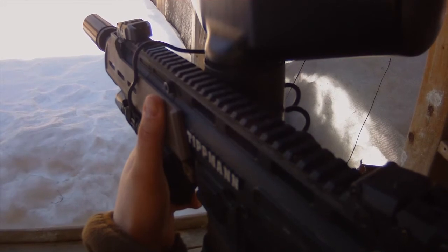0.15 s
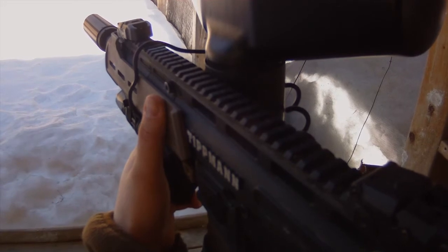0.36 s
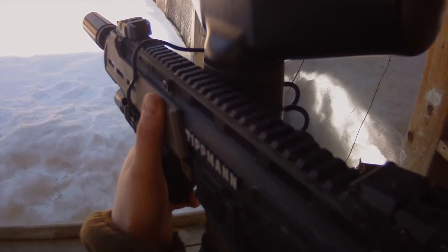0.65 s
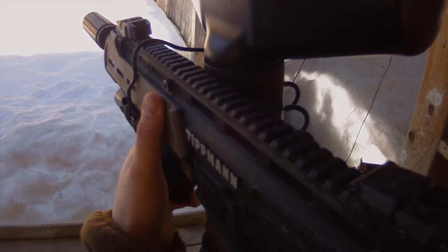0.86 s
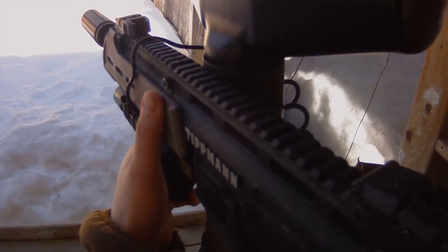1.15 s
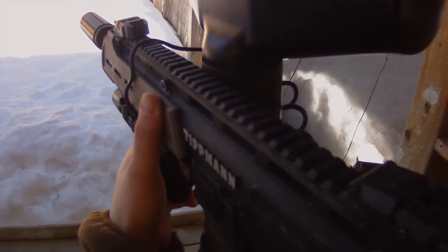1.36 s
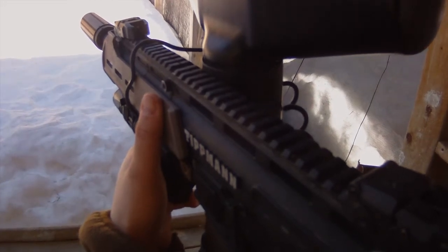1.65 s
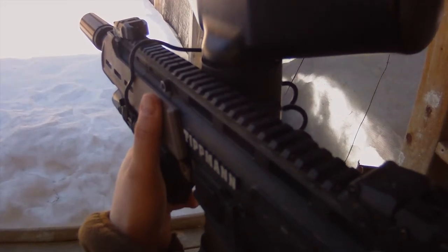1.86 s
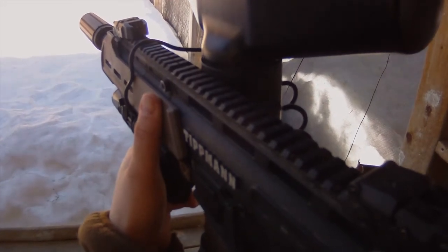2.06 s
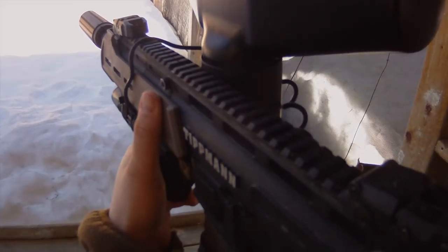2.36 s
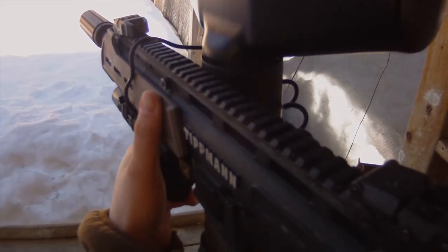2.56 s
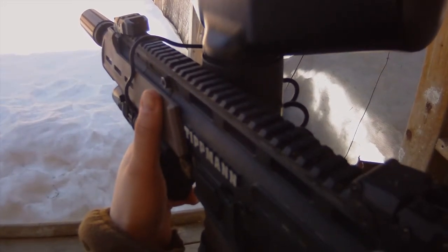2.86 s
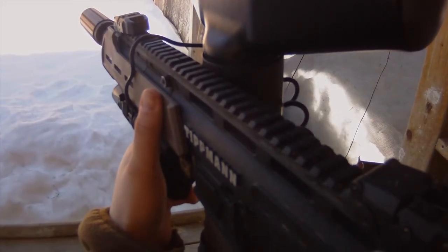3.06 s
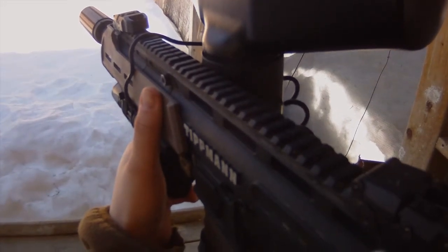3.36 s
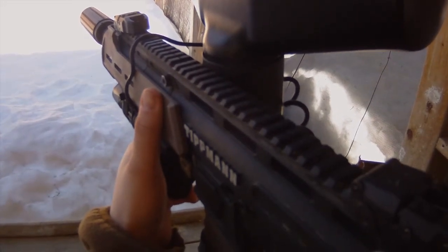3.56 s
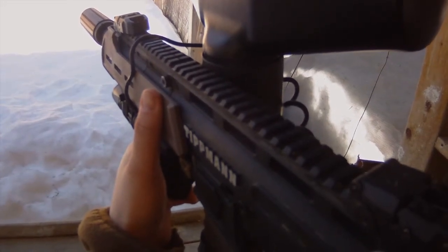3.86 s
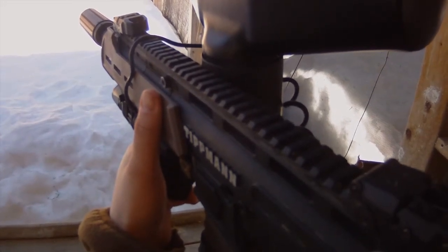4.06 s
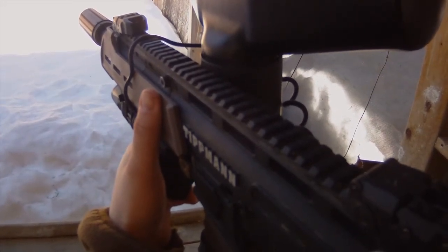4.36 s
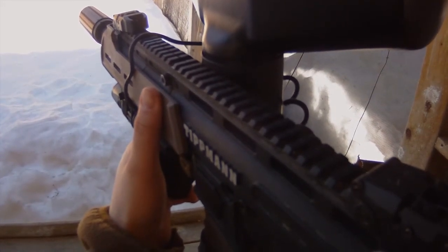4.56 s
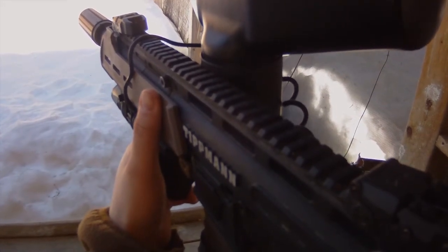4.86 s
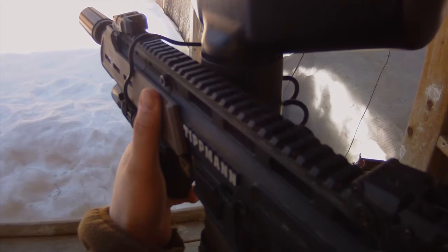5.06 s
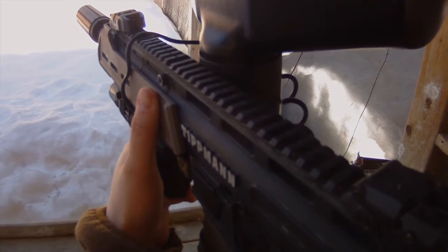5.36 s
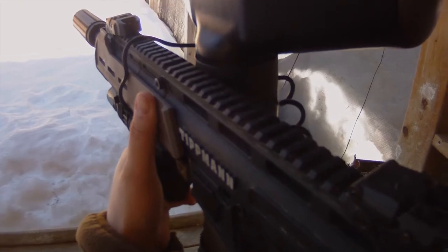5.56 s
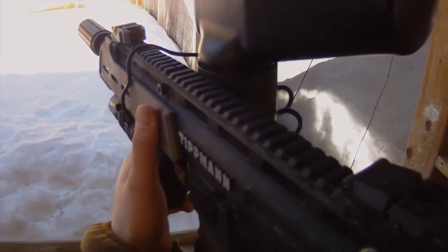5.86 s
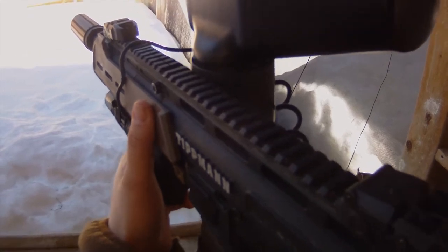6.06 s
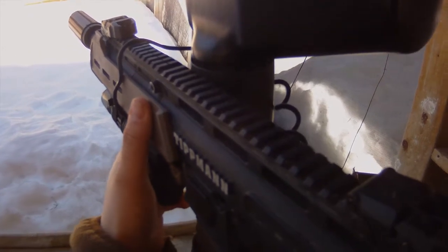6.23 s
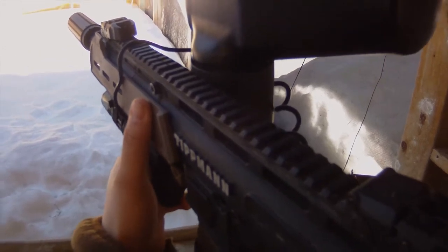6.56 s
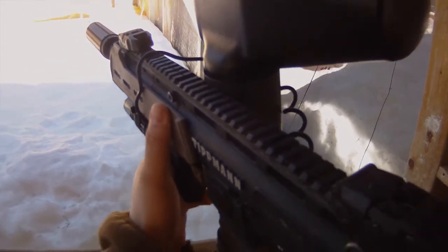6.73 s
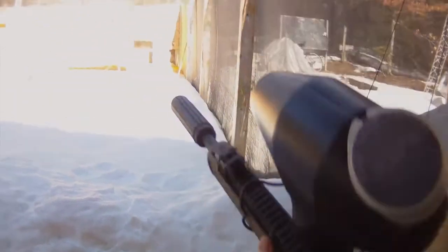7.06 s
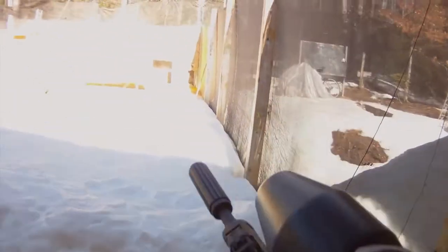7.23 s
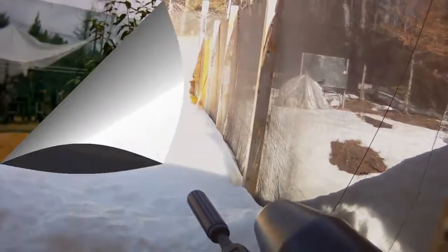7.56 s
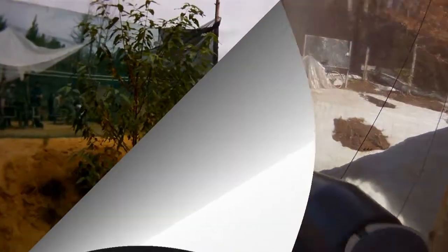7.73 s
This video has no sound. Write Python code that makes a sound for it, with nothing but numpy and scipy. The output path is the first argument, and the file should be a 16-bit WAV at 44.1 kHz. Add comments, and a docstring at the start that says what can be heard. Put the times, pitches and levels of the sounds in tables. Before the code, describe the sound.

In a wooden shelter on an open field, a paintball marker fires six full-auto bursts, thumping and clattering so close that the microphone slightly overloads. The first is longest, and the last three come in quick succession. Each leaves a short echo and faint ticks of balls. Two sharp snaps follow, then a lull with light wind. Near the end, a noisier background cuts in with distant markers popping.

```python
"""A wooden shelter on a snowy field: a paintball marker fires full-auto bursts, overloading a close mic.
Each shot is a thump of barrel air and a clatter of bolt and gas; the field echoes, single balls land and
faint ticks rattle on, likely in the hopper. Two sharp snaps follow the last burst, then balls shift as the
marker is lowered. Wind and a few hand bumps rumble on the mic. Near the end a noisier background
sets in abruptly, with markers popping farther off."""
import sys
import numpy as np
from scipy import signal
from scipy.fft import rfft, irfft
from scipy.io import wavfile
from scipy.ndimage import uniform_filter1d

SR = 44100
rng = np.random.default_rng(int(sys.argv[2]) if len(sys.argv) > 2 else 0)


def dump_mix(stems):
    """Bounce the given channels to the path in sys.argv[1] as a 16-bit WAV at rate SR."""
    frames = np.atleast_2d(stems).T  # one column per channel
    limited = np.clip(frames, -1, 1)  # hard clip at full scale
    pcm = np.round(limited * 32767).astype(np.int16)
    wavfile.write(sys.argv[1], SR, pcm)


N = 348384

# spectrum of the bolt's clack: f/Hz, level/dB
CLACK_SPECTRUM = [(100, -20.5), (400, -30.5), (750, -26.5), (1150, 0.5), (2400, -2), (4100, 2.5),
                  (4800, -7), (6600, 0), (7400, -9.5), (9000, -13.5), (11000, -9.5), (13000, -33.5)]
# resonances of the marker's body: f/Hz, width/Hz, height/dB
BODY_MODES = [(1220, 66, -1), (1354, 20, 5.5), (1950, 51, -1.5), (1960, 96, 5.5), (2296, 390, 7),
              (2410, 64, 4.5), (3010, 160, 4), (3450, 38, 6), (3620, 64, 5), (3990, 180, 1), (4280, 50, 7)]
# spectrum of a ball's impact: f/Hz, level/dB
BALL_SPECTRUM = [(150, -13), (350, -3), (540, 6), (800, -2), (1400, 1), (2400, 2.5), (4100, 3.5),
                 (4900, -10.5), (6700, -3.5), (8000, -13.5), (12000, -10.5)]
# spectrum of the echo off shelter and field: f/Hz, level/dB
ECHO_SPECTRUM = [(60, -16.5), (200, 0), (350, 3.5), (550, 2.5), (780, -4.5), (1300, -2), (2500, -2.5),
                 (4100, -2.5), (4900, -12.5), (6600, -9.5), (8000, -13), (12000, -22.5)]


def shots(cycle_s=0.03517, jitter_s=.00028, spread_db=.5, clack_sag=0.18):
    """Firing times and strengths (t/s, thump/dB, clack/dB); gas pressure can sag and recover."""
    # trigger pulls: t/s, shots, thump level/dB, clack level/dB, pressure sag/dB, shots to deepest sag
    bursts = [(-0.371, 10, -29, -11.5, 0, 1), (0.9567, 13, -12, -13.5, 6, 1.48),
              (2.5364, 7, -12, -13, 6, 0.7), (3.1618, 6, -12.5, -13, 0, 1), (4.3703, 5, -13, -14, 1.5, 1.7),
              (4.7061, 5, -12.5, -14, -0.5, 1), (5, 5, -11.5, -13, 1.5, 1)]
    # shots short of gas: t/s, thump loss/dB
    weak_shots = [(1.273, 1.5), (2.677, 4), (3.267, 4.5)]
    fired = []
    for start, count, thump_db, clack_db, sag_db, deepest in bursts:
        for k in range(count):
            s, progress = start + k * cycle_s, k / deepest
            sag = sag_db * progress * np.exp(1 - progress)
            lost = sum(db for at, db in weak_shots if abs(at - s) < cycle_s / 2)
            thump_vary, clack_vary = spread_db * rng.standard_normal(2)
            s += jitter_s * rng.standard_normal()
            fired.append((s, thump_db - sag - lost + thump_vary, clack_db - clack_sag * sag + clack_vary))
    return fired


def marker(fired, close_db=6, echo_db=19, lead_s=.02, jitter_s=.0002, spread_db=2):
    """The marker at the mic: each shot is a cycle of blows, a thump and an echo, never quite alike."""
    # sear, bolt, hammer on the valve (touch, crack), gas (drive, hiss), wall slap, vent, bolt catch,
    # settling: t/ms from the shot, level/dB, decay/ms, tilt/dB per octave, share of clean impact
    cycle = [(-10, -0.5, 2.1, 1, 0), (-6, 1.5, 4.2, 0.5, .05), (-3.5, 3.5, 9, -3.5, 0.3),
             (0.34, 19, 0.96, -1.1, .3), (2, 15, 6.4, -1.4, 0), (4, 10.5, 1.1, 5.5, .05),
             (5.4, 10.5, 1.5, -1, 0.6), (11, 0, 1.7, 1.5, 0.4), (14.5, 12, 3, -3.6, 0.1),
             (21, -1, 8.9, 2.5, 0)]
    out, impact = np.zeros(N), signal.unit_impulse(3000)
    blows = [(ms / 1000, db, decay_ms, clean, puff(decay_ms), ring(CLACK_SPECTRUM, tilt, BODY_MODES))
             for ms, db, decay_ms, tilt, clean in cycle]
    steady_echo, stray_echoes = field_echo(), [field_echo() for _ in range(4)]
    for k, (s, thump_db, clack_db) in enumerate(fired):
        clack = rattle()
        for lag, db, decay_ms, clean, usual_push, body in blows:
            rough = blend(usual_push, puff(decay_ms), share=0.68)
            blow = signal.fftconvolve(blend(impact, rough, clean), body)
            add(clack, rng.normal(lead_s + lag, jitter_s), amp(rng.normal(db, spread_db)) * blow)
        # loose parts seat differently each time, so another band of the body speaks
        band = (rng.uniform(2700, 4400), 500, 4.5)  # f/Hz, width/Hz, height/dB
        chatter = ring([(20, 0), (20000, 0)], tilt=rng.normal(0.11, .6), peaks=[band], size=1024)
        chatter /= np.mean(abs(rfft(chatter)[20:50]))  # unity gain over about 1.7-4.3 kHz
        add(out, s - lead_s, amp(clack_db + close_db) * signal.fftconvolve(clack, chatter))
        add(out, s + .00028, amp(thump_db + close_db) * barrel_thump())
        add(out, s, amp(clack_db + echo_db) * blend(steady_echo, stray_echoes[k % 4], share=0.23))
    return out


def barrel_thump(barrel_hz=458.5, width_hz=157, size=3000):
    """Air in the barrel rings briefly, reaches the mic by several paths and sets the shelter booming."""
    # paths, direct and off gun, floor and walls: delay/ms, signed gain
    paths = [(0, 1), (1.256, -.54), (5.07, 1.4), (7.75, -.68), (8.06, .24), (13.84, .19)]
    # hollow modes of the shelter: f/Hz, width/Hz, signed gain
    shelter_modes = [(124.7, 31, 0.087), (236, 16, .14), (591.7, 22, -0.4)]
    out, t = np.zeros(size), np.arange(size) / SR
    hz = barrel_hz * rng.normal(1, 0.017)
    for ms, gain in paths:
        age = np.maximum(t - ms / 1000, 0)
        arrival = (age > 0) * np.exp(-np.pi * width_hz * age) * np.cos(2 * np.pi * hz * age)
        out -= gain * rng.normal(1, .07) * arrival
    boom = sum(gain * mode(f, width, t) for f, width, gain in shelter_modes)
    return highpass(highpass(out, hz=100) + boom, hz=45)


def rattle(db=-5, spread_db=3, count=5):
    """Loose parts and balls knock at random moments through one firing cycle."""
    out, body = np.zeros(SR // 8), ring(CLACK_SPECTRUM, tilt=3.3, peaks=BODY_MODES, size=2048)
    for s, force in zip(rng.uniform(.012, .047, count), rng.uniform(-2, 1, count)):
        push = unit_energy(puff(decay_ms=1, size=600))
        add(out, s, amp(db + spread_db * force) * signal.fftconvolve(push, body))
    return out


def field_echo(rise_s=0.0046, size=36000):
    """Echo of energy 1, grainy with reflections off trees and boards, the midrange lasting longest."""
    # reverberation time: f/Hz, t60/s
    decay_times = [(100, 0.08), (300, 0.41), (700, 0.71), (1500, 0.43), (3000, 0.38), (6000, 0.37),
                   (11000, 0.18)]
    grain = flutter(depth_db=3, span=150, size=size)
    hz, t, bands = signal.stft(noise(ECHO_SPECTRUM, size) * grain, SR, nperseg=256)
    decay = amp(-60 * t / read(decay_times, hz)[:, None])
    tail = signal.istft(bands * decay, SR, nperseg=256)[1][:size]
    rise = 1 - np.exp(-(np.arange(size) / SR / rise_s) ** 2)
    return unit_energy(tail * rise)


def snaps(scatter_db=-13, echo_db=-34, size=9000):
    """A hard part snaps twice close by; the gun scatters it and the shelter adds a faint bright echo."""
    # snaps: t/s, level/dB, pitch factor, damping factor, tilt/dB per octave
    hits = [(5.6943, -15, 0.927, 0.95, -1.5), (5.7541, -17, 0.92, 0.91, 1.5)]
    # resonances of the part: f/Hz, width/Hz, level/dB
    part_modes = [(2243, 500, -8), (3970, 650, 5), (4430, 390, 2.5), (6290, 520, 5.5), (6480, 640, 7.5),
                  (7490, 510, -7.5), (8600, 360, -9), (10500, 400, -10), (11900, 1600, -8)]
    out, t = np.zeros(N), np.arange(size) / SR
    for s, db, pitch, damping, tilt in hits:
        ringing = sum((-1) ** k * amp(height + tilt * np.log2(hz)) * mode(hz * pitch, width * damping, t)
                      for k, (hz, width, height) in enumerate(part_modes))
        add(out, s, at_level(highpass(ringing, hz=900, order=2), db))  # a small part radiates little bass
        add(out, s, strike(puff(decay_ms=2.9), ring(CLACK_SPECTRUM, tilt=1), db + scatter_db))
        add(out, s, strike(puff(decay_ms=36, size=size), ring(ECHO_SPECTRUM, tilt=3), db + echo_db))
    return out


def ball_ticks(gain_db=2, rise_ms=0.68):
    """Single balls burst on boards downrange or knock in the plastic hopper, squashing as they land."""
    # the clearest balls: t/s, relative level/dB, tilt/dB per octave
    landings = [(0.0828, -38, 0.5), (0.1403, -38.5, -8), (0.1748, -43, -6), (0.241, -41, -6.5),
                (0.387, -42.5, -5), (0.4684, -43, -6.5), (0.5412, -45.5, -6.5), (0.5985, -45.5, -8),
                (0.6364, -43, -5), (0.8525, -53, -4), (1.509, -41.5, 3), (1.5979, -36.5, -7),
                (1.7561, -41, -7.5), (1.9141, -47.5, -7.5), (2.0276, -50.5, -3.5), (2.0613, -45, -7),
                (2.086, -53, -3), (2.1634, -46, -7), (2.915, -32.5, 0.5), (3.5059, -36.5, 4),
                (3.7935, -53, -12), (3.8866, -58, -15), (4.2583, -49.5, -4.5), (4.2871, -47, -5),
                (4.644, -37, 0.9), (5.5422, -47.5, -6.5), (6.1826, -61, -1)]
    out = np.zeros(N)
    for s, db, tilt in landings:
        squash = puff(decay_ms=5.2) * (1 - abs(puff(rise_ms)))
        add(out, s - .001, strike(squash, ring(BALL_SPECTRUM, tilt + 0.35), db + gain_db))
    return with_echo(out, wet_db=-15)


def hopper_rattle(fired, delay_s=(.12, 0.69), tick_db=-45.5, fall_db_per_s=16, spread_db=2, count=7):
    """Faint, dense ticks rattle on after each shot, likely balls in the hopper, slowly fading."""
    out = np.zeros(N)
    for s, _, _ in fired:
        delays = rng.uniform(*delay_s, count)
        forces, colours = np.clip(rng.standard_normal((2, count)), -2, 2)
        for delay, force, colour in zip(delays, forces, colours):
            db = tick_db - fall_db_per_s * delay + spread_db * force
            body = ring(BALL_SPECTRUM, tilt=colour - 5, size=512)
            add(out, s + delay, strike(puff(decay_ms=2, size=900), body, db))
    return with_echo(out, wet_db=-15)


def lowering_clatter(start_s=7.003, density=0.033, size=9000):
    """Balls shift in the hopper as the marker is lowered: one knock and a short clatter."""
    # resonances of the hopper: f/Hz, width/Hz, height/dB
    hopper_modes = [(2440, 180, 11.5), (3760, 500, 8)]
    out = np.zeros(N)
    knock = puff(decay_ms=3, size=size)
    clatter = amp(-3) * puff(decay_ms=36, size=size) * rng.exponential(3.9, size)
    clatter *= rng.random(size) < density
    add(out, start_s, strike(knock + clatter, ring(BALL_SPECTRUM, tilt=-4, peaks=hopper_modes), db=-48))
    return out


def handling_bumps():
    """Handling noise right at the mic: a hand gives the camera's case dull, short pushes."""
    # pushes: t/s, level/dB
    pushes = [(2.233, -49.5), (2.39, -45), (3.761, -51), (7.453, -36), (7.491, -31), (7.503, -41)]
    # response of the case: f/Hz, level/dB
    case_spectrum = [(20, -35), (70, -4), (140, -2), (260, -3.5), (450, -13), (1000, -40), (4000, -60)]
    out = np.zeros(N)
    for s, db in pushes:
        add(out, s, strike(puff(decay_ms=5), ring(case_spectrum), db))
    return out


def mic_wind():
    """Lumpy gusts rumble on the microphone."""
    # strength of the wind: t/s, level/dB
    gusts = [(0, -67), (.6, -54), (1.5, -62), (1.95, -52), (2.45, -55.5), (3.75, -55.5), (3.95, -81),
             (5.1, -67), (5.35, -57.5), (6.1, -82.5), (6.5, -68.5), (7.3, -73.5), (7.43, -48), (7.9, -53)]
    # its rumble: f/Hz, level/dB
    wind_spectrum = [(20, -12.5), (70, 0.5), (160, -0.5), (300, -5.5), (600, -21), (1500, -54.5)]
    lumps = flutter(depth_db=3, span=1500)
    return level(gusts) * unit_rms(noise(wind_spectrum, N) * lumps)


def open_field(fired, air_db=-70.5, roll_db=-53.5, fall_db_per_s=28.5):
    """Still air, the field's distant hum and its dull late roll after every shot."""
    # open air: f/Hz, level/dB
    air_spectrum = [(18, -29.5), (30, -3.5), (172, -4), (342, -10), (475, -4.5), (553, -16.5), (597, -5),
                    (872, -22), (965, -14), (1100, -31), (1240, -15), (2340, -13.5), (3020, -15),
                    (10700, -20.5), (12800, -48.5), (16600, -68), (22000, -120)]
    # colour of both hum and roll: f/Hz, level/dB
    far_spectrum = [(150, -16), (350, -6), (530, 4.5), (800, -9), (1300, -12), (2500, -21), (5000, -37.5)]
    # distant hum: t/s, level/dB
    hum_levels = [(0, -49), (.9, -67.5), (4.2, -65), (6.25, -71), (6.5, -63.5), (6.9, -72)]
    power = level(hum_levels) ** 2
    roll = amp(roll_db - fall_db_per_s * np.arange(2 * SR) / SR)
    for s, _, _ in fired:
        add(power, s, roll ** 2)
    return amp(air_db) * noise(air_spectrum, N) + np.sqrt(power) * noise(far_spectrum, N)


def busy_field(start_s=7.361, wash_db=-40, faint_db=-39.5, gap_s=0.036):
    """A wash of noise sets in at once, with distant markers: a few clear pops among many faint ones."""
    # the clear pops: t/s, level/dB, decay/ms, tilt/dB per octave
    clear_pops = [(7.377, -31.5, 1.7, 5), (7.5203, -29, 2.9, 1), (7.550, -38, 5.5, 0.5),
                  (7.601, -33, 3.4, -2.5), (7.6915, -29.5, 2.5, 0.5), (7.765, -29, 1.6, 1),
                  (7.858, -32.5, 6.4, -3)]
    # a marker heard from afar: f/Hz, level/dB
    pop_spectrum = [(150, -23), (500, 5.5), (850, -4.5), (1400, 2), (2300, 7), (2900, 2.5), (3700, 11.5),
                    (4700, -8.5), (6600, -8), (8500, -18), (11000, -23)]
    # wash of the field: f/Hz, level/dB
    wash_spectrum = [(35, -38), (60, -13), (135, 3), (276, -9), (452, 7), (948, -11.5), (1390, -6.5),
                     (2170, -12.5), (2430, -6.5), (3990, -18.5), (4460, -23), (6530, -18), (7810, -33),
                     (11400, -31), (12800, -66), (16600, -90.5), (22000, -120)]
    faint_pops = [(s + gap_s * rng.random(), faint_db, 4, rng.normal(2, 4.2))
                  for s in np.arange(start_s, N / SR, gap_s)]
    pops = np.zeros(N)
    for s, db, decay_ms, tilt in clear_pops + faint_pops:
        add(pops, s, strike(puff(decay_ms), ring(pop_spectrum, tilt), db))
    wash = amp(wash_db) * unit_rms(flutter(depth_db=2.5, span=300) * noise(wash_spectrum, N))
    return wash * (np.arange(N) / SR > start_s) + with_echo(pops, wet_db=-14)


def amp(db):
    """Decibels to gain."""
    return 10 ** (np.asarray(db) / 20)


def unit_rms(x):
    """Scales to rms 1."""
    return x / np.sqrt(np.mean(x ** 2) + 1e-20)


def unit_energy(x):
    """Scales to energy 1."""
    return x / np.linalg.norm(x)


def read(points, hz):
    """Reads a table on a log-frequency axis."""
    f, value = np.transpose(points)
    return np.interp(np.log(hz + 1), np.log(f + 1), value)


def level(points):
    """A curve of t/s, level/dB as a gain for every sample."""
    return amp(np.interp(np.arange(N) / SR, *np.transpose(points)))


def add(mix, s, sound):
    """Mixes a sound in at time s, which may lie before the start."""
    at = int(round(s * SR))
    sound = sound[max(-at, 0):]
    part = mix[max(at, 0):][:len(sound)]
    part += sound[:len(part)]


def blend(a, b, share):
    """Mixes two sounds, giving the first the stated share of the energy."""
    return np.sqrt(share) * unit_energy(a) + np.sqrt(1 - share) * unit_energy(b)


def noise(spectrum, size):
    """Noise of rms 1 with a given spectrum."""
    gains = amp(read(spectrum, np.fft.rfftfreq(size, 1 / SR)))
    return unit_rms(irfft(rfft(rng.standard_normal(size)) * gains, size))


def flutter(depth_db, span, size=N):
    """A gain that wavers at random, smoothed over span samples."""
    return amp(depth_db * unit_rms(uniform_filter1d(rng.standard_normal(size), size=span)))


def highpass(sound, hz, order=1):
    """Cuts the bass below hz."""
    return signal.lfilter(*signal.butter(order, hz, "high", fs=SR), sound)


def mode(hz, width_hz, t):
    """One struck resonance: the wider it is, the sooner it dies."""
    return np.exp(-np.pi * width_hz * t) * np.sin(2 * np.pi * hz * t)


def ring(spectrum, tilt=0, peaks=(), size=4096):
    """Impulse response of energy 1 from a spectrum, a tilt in dB per octave and resonance peaks."""
    hz = abs(np.fft.fftfreq(size, 1 / SR))
    db = read(spectrum, hz) + tilt * np.log2(np.clip(hz, 500, 11000))
    db += sum(height / (1 + (2 * (hz - f) / width) ** 2) for f, width, height in peaks)
    minimum_phase = np.exp(signal.hilbert(np.log(amp(db))).conj())
    return unit_energy(np.fft.ifft(minimum_phase).real[:size // 2])


def puff(decay_ms, size=3000):
    """A contact or spurt of gas: random pushes that die away."""
    return rng.choice([-1., 1.], size) * np.exp(-np.arange(size) / SR * 1000 / decay_ms)


def at_level(sound, db):
    """Sets the rms level of a hit's first six milliseconds."""
    return amp(db) * sound / np.sqrt(np.mean(sound[:265] ** 2))


def strike(push, body, db):
    """A push rings a body; the hit opens at the given level."""
    return at_level(signal.fftconvolve(push, body), db)


def with_echo(sound, wet_db):
    """A sound plus its echo off the field."""
    return sound + amp(wet_db) * signal.fftconvolve(sound, field_echo())[:N]


def scene():
    """All sources at one microphone in the shelter."""
    fired = shots()
    action = marker(fired) + ball_ticks() + hopper_rattle(fired) + snaps() + lowering_clatter()
    return (action + handling_bumps() + mic_wind() + open_field(fired) + busy_field())[None]


def record(dry, ceiling=.95, edge_hz=12100):
    """The close shots overload the input into soft clipping; a low-pass then cuts the top treble."""
    clipped = dry / (1 + (dry / ceiling) ** 6) ** (1 / 6)
    lowpass = signal.firwin(201, edge_hz, window=("kaiser", 7), fs=SR)
    return signal.oaconvolve(clipped, lowpass[None], "same")


dry = scene()
out = record(dry)
dump_mix(out)
```